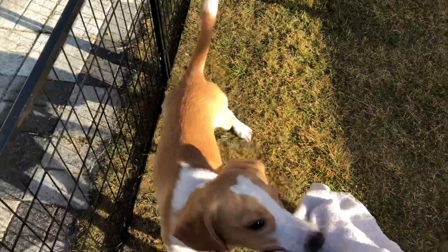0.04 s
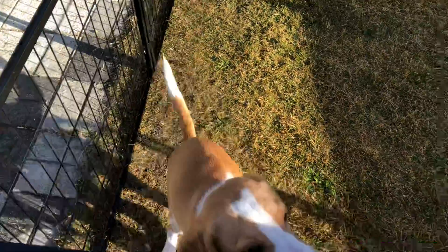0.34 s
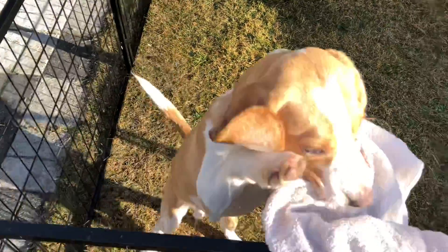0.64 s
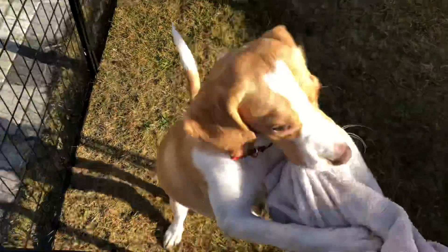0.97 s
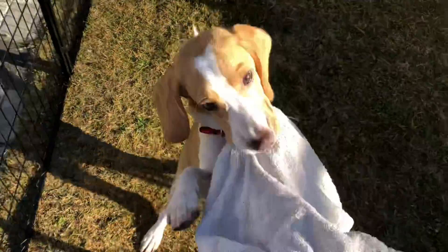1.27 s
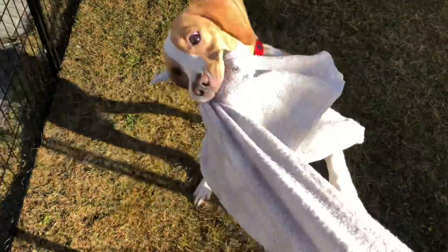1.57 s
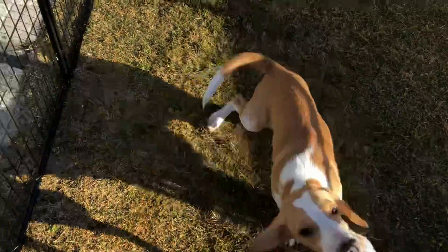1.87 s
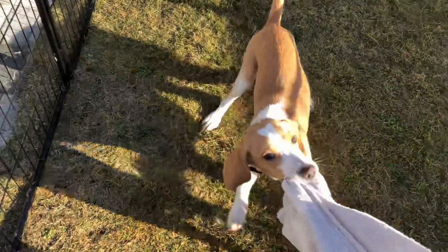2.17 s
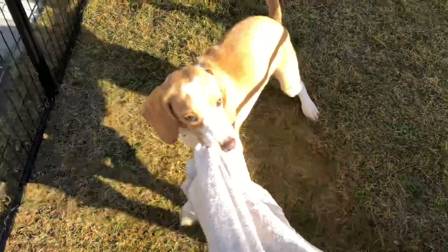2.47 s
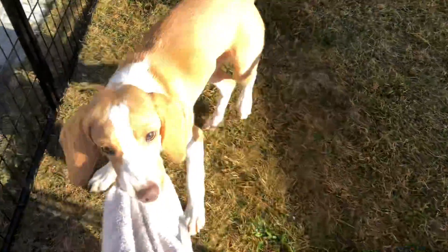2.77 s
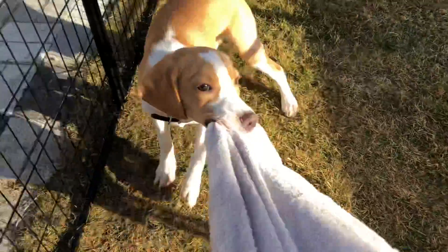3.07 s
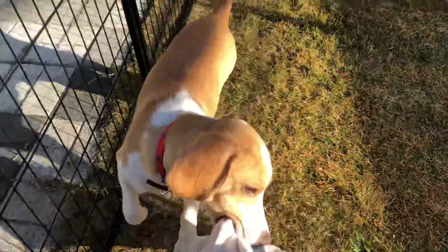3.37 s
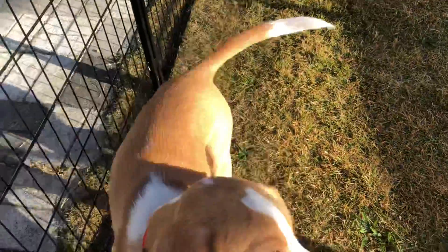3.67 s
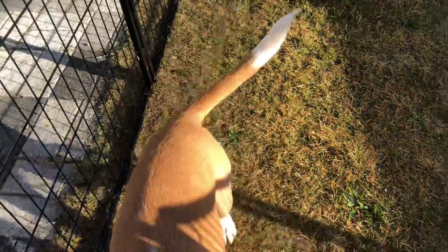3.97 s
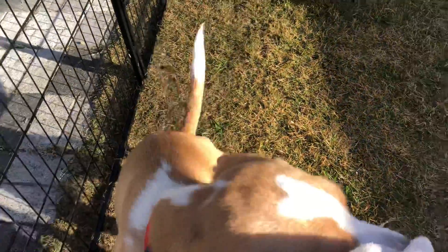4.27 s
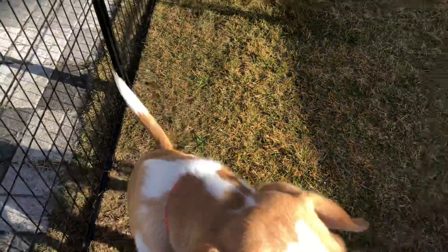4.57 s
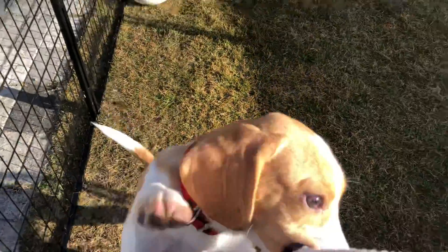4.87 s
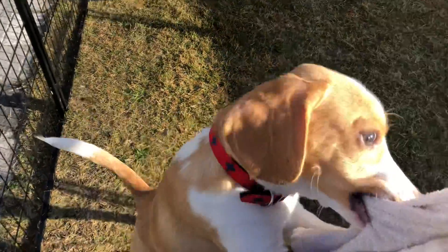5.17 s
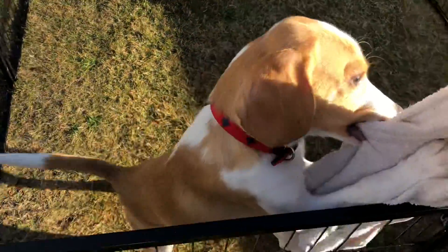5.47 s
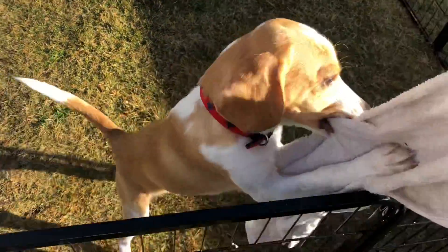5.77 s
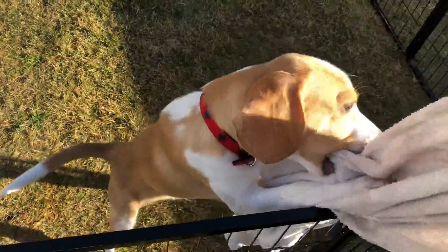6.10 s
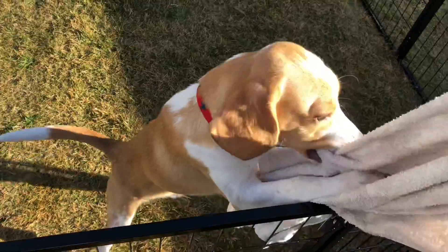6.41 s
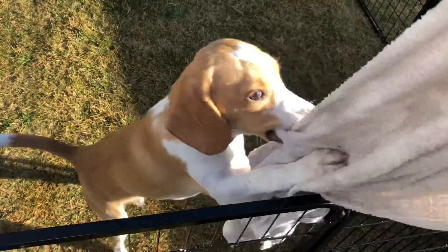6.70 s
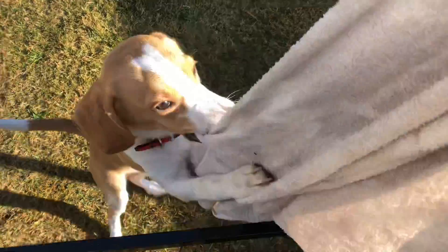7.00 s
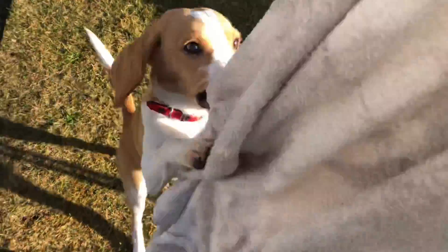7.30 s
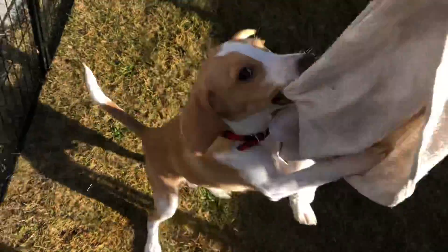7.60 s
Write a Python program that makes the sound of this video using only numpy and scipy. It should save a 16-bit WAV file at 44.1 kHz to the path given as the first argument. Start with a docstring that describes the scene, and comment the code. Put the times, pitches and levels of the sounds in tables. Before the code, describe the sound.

A puppy tugs a towel beside a wire pen outdoors, heard close. Soft, uneven cloth rubbing runs throughout, with tiny tooth ticks and occasional dull paw thuds on grass, over a low rumble and a faint distant engine. At about 0.5 seconds the pen's wires give a loud, bright double clink that rings briefly. At 1.9 seconds the pen takes a loud knock with a short rattle. Sharp snaps and a faint knock come around 2.5 seconds, followed by a stronger rustle. Lighter clinks sound at 3.8 and 4.3 seconds, and a sharp snap lands near 5 seconds among paw thuds. Small clinks follow at 5.3 and 6 seconds, then two thin snaps around 6.5 to 6.8. From 7.3 seconds the towel scrapes over the hollow top rail with a few light clinks, and the rustling continues until about 8 seconds.

```python
"""Cloth rubs over a low outdoor rumble, then wires clink: a puppy tugs a towel beside a wire pen.
The towel's loops catch and slip, teeth tick in it and paws thud on the turf; cloth, claws and wire snap.
Each bump rings the pen's wires and mesh in a short chatter; its frame takes a loud knock and a faint one.
Near the end the towel scrapes over the hollow top rail. A far engine drones underneath."""
import sys
import numpy as np
from scipy import signal
from scipy.fft import rfft, irfft, next_fast_len
from scipy.io import wavfile

SR = 44100
rng = np.random.default_rng(int(sys.argv[2]) if len(sys.argv) > 2 else 0)


def store_pcm(level_fs):
    """Save levels as 16-bit WAV."""
    pcm = np.round(np.clip(level_fs, -1, 1) * 32767).astype(np.int16)
    wavfile.write(sys.argv[1], SR, np.atleast_2d(pcm).T)


N = 346185


def from_db(db):
    return 10 ** (np.asarray(db) / 20)


def unit_rms(x):
    return x / np.sqrt(np.mean(x ** 2) + 1e-20)


def in_time(rows):
    """Columns of a time curve at every sample."""
    times_s, *columns = np.transpose(rows)
    return [np.interp(np.arange(N) / SR, times_s, column) for column in columns]


def at_hz(points, hz):
    """Interpolate on a log-frequency axis."""
    points_hz, values = np.transpose(points)
    return np.interp(np.log(np.maximum(hz, 1)), np.log(points_hz), values)


def band(x, low_hz, high_hz, order=2):
    return signal.sosfilt(signal.butter(order, [low_hz, high_hz], "band", fs=SR, output="sos"), x)


def band_noise(samples, low_hz, high_hz, order=2):
    return unit_rms(band(rng.standard_normal(samples), low_hz, high_hz, order))


def colour(x, spectrum):
    """Shape a noise by a spectrum; rms 1."""
    size = next_fast_len(N)
    gain = from_db(at_hz(spectrum, np.fft.rfftfreq(size, 1 / SR)))
    return unit_rms(irfft(rfft(x, size) * gain, size)[:N])


def drift(per_s):
    """Slow random wander; rms 1."""
    knots = rng.standard_normal(2000)
    return unit_rms(np.interp(np.arange(N) / SR * per_s, np.arange(len(knots)), knots))


def add(out, start_s, sound):
    start = round(start_s * SR)
    out[start:start + len(sound)] += sound[:N - start]


def fade(t, t60_s):
    return np.exp(-np.log(1000) * t / t60_s)


# Each row: frequency in Hz, relative density in dB.
AIR_SPECTRUM = [(20, -4.5), (35, -0.5), (55, 2), (80, -1), (130, 0), (200, -4.5), (300, -8), (500, -11),
                (1000, -15), (2000, -23), (4000, -31), (9000, -33.5), (16000, -33)]
# Each row: time in seconds, relative level in dB.
RUMBLE_LEVELS = [(0, -58), (0.8, -75), (1.8, -60), (2.7, -60.5), (4.3, -60), (5.15, -53.5), (5.45, -60),
                 (7.05, -63), (7.45, -55), (7.85, -66)]
# Each row: time in seconds, rms level in dB.
ENGINE_LEVELS = [(0, -76.5), (4.8, -64.5), (5.3, -58.5), (5.9, -60.5), (6.3, -76), (7.85, -63.5)]


def outdoors(air_db=-59, rumble_gain_db=-2, engine_hz=72.6, whine_db=-78, whine_hz=15050):
    """Steady air, a swelling far rumble, a distant engine and a faint high whine."""
    air = from_db(air_db) * colour(rng.standard_normal(N), AIR_SPECTRUM)
    rumble_db = in_time(RUMBLE_LEVELS)[0] + rumble_gain_db + 2.8 * drift(9)
    rumble = from_db(rumble_db) * band_noise(N, 33, 230)
    cycles = np.cumsum(engine_hz * (1 + 0.02 * drift(5))) / SR
    engine = from_db(in_time(ENGINE_LEVELS)[0]) * np.sqrt(2) * np.sin(2 * np.pi * cycles)
    whine = from_db(whine_db) * band_noise(N, whine_hz - 120, whine_hz + 120, order=1)
    return air + rumble + engine + whine


# Each row: start in seconds, peak in dB, pitch in Hz.
PAW_STEPS = [(0.668, -47.5, 294), (1.514, -43, 91), (1.445, -48.5, 131), (2.006, -48.5, 125),
             (2.371, -47, 350), (2.56, -39.5, 161), (3.635, -47, 170), (4.626, -47.5, 328),
             (4.956, -46, 162), (5.052, -41.5, 228), (5.285, -46.5, 279), (6.632, -50, 170),
             (7.47, -45.5, 128)]


def paws(rise_s=0.0064):
    """Soft pushes on the turf, each a low thud of noise."""
    out, t = np.zeros(N), np.arange(SR // 5) / SR
    for start_s, peak_db, hz in PAW_STEPS:
        push = rng.standard_normal(len(t)) * t * np.exp(-t / rise_s)
        thud = band(push, hz / 1.85, hz * 1.57)
        add(out, start_s, from_db(peak_db) * thud / np.abs(thud).max())
    return out


# Each row: time in seconds, level in dB, brightness in dB.
TOWEL_SLIDING = [(0, -75.5, 7.5), (0.4, -76, 2.5), (0.9, -64, -3), (1.3, -72, 3), (2.0, -69.5, 4.5),
                 (2.65, -66, -0.5), (3.08, -77.5, 7.5), (3.4, -71.5, 6), (3.7, -63.5, 2), (4.2, -67, -1.5),
                 (4.62, -64.5, 3), (5.15, -68.5, -1.5), (5.45, -70, 4), (5.75, -77.5, -2),
                 (6.25, -81, -5.5), (6.42, -70.5, -3), (7.15, -70.5, -2.5), (7.85, -68, -6)]
# Each row: peak time in seconds, width at half height in seconds, level in dB, brightness in dB.
TOWEL_STROKES = [(0.115, 0.43, -70, -15.5), (1.47, 0.074, -66, -1), (1.646, 0.07, -58.5, 0),
                 (1.812, 0.22, -63, -7), (2.234, 0.043, -67.5, -3), (2.393, 0.047, -71, -14),
                 (2.58, 0.13, -60, -3.5), (2.811, 0.062, -56.5, -1.5), (4.063, 0.26, -64, -1),
                 (4.484, 0.092, -59.5, -5), (4.71, 0.13, -67.5, -6), (5, .14, -64, -4.5),
                 (6.59, 0.076, -73.5, -13), (6.927, 0.1, -72.5, 7), (7.026, 0.049, -57, 0.5),
                 (7.309, 0.063, -58.5, -5.5), (7.528, 0.19, -62.5, -12), (7.717, 0.11, -63.5, -3),
                 (7.835, 0.15, -57.5, -1)]


def cloth_motion(lean, rise_share=0.68):
    """Gain of steady sliding plus quick tugs; lean is negative for a dull layer, positive for a bright."""
    t = np.arange(N) / SR
    slide_db, slide_bright_db = in_time(TOWEL_SLIDING)
    power = from_db(slide_db + lean * slide_bright_db) ** 2
    for peak_s, width_s, level_db, bright_db in TOWEL_STROKES:
        start_s = peak_s - 2 * rise_share * width_s
        swell = np.interp(t, [start_s, peak_s, start_s + 2 * width_s], [0, 1, 0])
        power += (from_db(level_db + lean * bright_db) * swell) ** 2
    return np.sqrt(power)


def friction(spectrum, grains_per_s, flutter_db, smooth_gain=0.98):
    """Loops of cloth catch and slip: uneven grains over a smooth hiss."""
    grains = (rng.random(N) < grains_per_s / SR) * rng.standard_normal(N)
    texture = unit_rms(grains) + smooth_gain * rng.standard_normal(N)
    return colour(texture * from_db(flutter_db * drift(45)), spectrum)


# The towel's three layers. Each row: frequency in Hz, relative density in dB.
RUB_SPECTRUM = [(150, -16.5), (350, -11), (550, -6.5), (800, 0), (1150, 1.5), (1500, -5), (2200, -18.5),
                (4000, -25.5)]
BRUSH_SPECTRUM = [(900, -19), (1800, 3), (2500, 1), (3900, 0.5), (5500, -7), (9000, -22)]
HISS_SPECTRUM = [(3500, -4.5), (6500, 0.5), (10000, -1), (13000, -2.5), (16000, -16)]


def towel(brush_gain_db=-1):
    """Cloth drags over itself, fur and the rail: pressed hard it rubs dully, sliding lightly it hisses."""
    rub = cloth_motion(-0.81) * friction(RUB_SPECTRUM, grains_per_s=800, flutter_db=4, smooth_gain=0.75)
    brush = cloth_motion(0) * friction(BRUSH_SPECTRUM, grains_per_s=2000, flutter_db=3.5)
    hiss = cloth_motion(1) * friction(HISS_SPECTRUM, grains_per_s=6500, flutter_db=2)
    return rub + from_db(brush_gain_db) * brush + hiss


# Each row: time in seconds, rms level in dB.
SCRAPE_LEVELS = [(7.265, -89.5), (7.295, -54), (7.36, -49), (7.46, -56.5), (7.53, -57.5), (7.62, -58),
                 (7.72, -66.5), (7.85, -76)]
# Each row: centre in Hz, bandwidth in Hz, relative level in dB.
RAIL_RESONANCES = [(746, 78, -8), (940, 90, -11), (1089, 57, 1), (1290, 110, -8.5), (1468, 79, -10.5)]


def rail_scrape(slips_per_s=1500, flutter_db=2):
    """Dense slips of the towel keep the hollow top rail ringing."""
    slips = (rng.random(N) < slips_per_s / SR) * rng.standard_normal(N)
    slips = slips * from_db(flutter_db * drift(35)) + 1e-18
    rail = sum(from_db(db) * unit_rms(band(slips, hz - width_hz / 2, hz + width_hz / 2, order=1))
               for hz, width_hz, db in RAIL_RESONANCES)
    return from_db(in_time(SCRAPE_LEVELS)[0]) * unit_rms(rail)


# Each row: start in seconds, relative level in dB.
TOOTH_TICKS = [(0.352, -50), (0.69, -49), (0.707, -46.5), (0.873, -45), (1.019, -46), (1.126, -45),
               (1.211, -47.5), (1.312, -46), (1.428, -47.5), (1.686, -46.5), (2.023, -48.5), (2.518, -46),
               (2.838, -45.5), (2.92, -50), (3.732, -42), (4.017, -45.5), (4.94, -41), (5.061, -46.5),
               (5.982, -48.5), (6.746, -49), (7.257, -46)]


def tooth_ticks(gain_db=1, start_hz=1880, end_hz=510, click_db=-2, scatter_db=-23,
                faint_per_s=2, faint_db=-55.5):
    """Teeth work the cloth: a tiny click, a fast fall in pitch, a scatter. Faint ticks come at random."""
    out, t = np.zeros(N), np.arange(SR // 10) / SR
    faint = [(i / SR, faint_db) for i in np.flatnonzero(rng.random(N) < faint_per_s / SR)]
    click = band(signal.unit_impulse(len(t)), 2060, 4000)
    click *= from_db(click_db) / np.abs(click).max()
    for start_s, level_db in list(TOOTH_TICKS) + faint:
        glide_s, rise_s = np.array([0.0016, 0.001]) * np.exp(0.15 * rng.standard_normal(2))
        hz = end_hz + (start_hz - end_hz) * np.exp(-t / glide_s)
        envelope = t / rise_s * np.exp(1 - t / rise_s)
        tone = np.sin(2 * np.pi * np.cumsum(hz) / SR) * envelope
        scatter = from_db(scatter_db) * band_noise(len(t), 700, 4000, order=1) * fade(t, t60_s=0.065)
        add(out, start_s, from_db(level_db + gain_db) * (tone + click + scatter))
    return out


# Each row: start in seconds, peak in dB, centre in Hz.
SHARP_SNAPS = [(2.4694, -37, 2580), (2.5454, -32, 1390), (2.548, -25.5, 810), (2.5498, -24, 1670),
               (4.961, -23, 4380), (5.051, -34.5, 7000), (6.4967, -37.5, 10000), (6.76, -39, 9800)]


def snaps(edge_ratio=1.68, tail_db=-33, tail_t60_s=0.054):
    """Sharp, heavily damped snaps of taut cloth, claws and struck pen wire, with a faint scatter."""
    out, t = np.zeros(N), np.arange(SR // 10) / SR
    for start_s, peak_db, hz in SHARP_SNAPS:
        push = from_db(tail_db) * np.sqrt(hz / 10000) * rng.standard_normal(len(t)) * fade(t, tail_t60_s)
        push[0] = 1
        snap = band(push, hz / edge_ratio, hz * edge_ratio, order=3)
        add(out, start_s, from_db(peak_db) * snap / np.abs(snap).max())
    return out


# Each row: start in seconds, crack in dB, panel rattle in dB, frame ring in dB.
FRAME_KNOCKS = [(1.8879, -24.5, -40.5, -26.5), (2.55, -47, -49, -56)]
# Each row: frequency in Hz, relative level in dB, t60 in seconds.
FRAME_MODES = [(107, 9, 0.0093), (170, -5, 0.14), (340, -8, 0.063), (561, -7, 0.07), (592, -9, 0.12),
               (1130, -28, 0.092), (1540, -4.5, 0.05), (1593, -14, 0.21), (1860, -9, 0.047),
               (2350, -4, 0.02)]


def frame_knocks(crack_rise_s=0.00096, frame_lag_s=0.00227):
    """A bright crack, then the heavy frame swings and its panel rattles."""
    out, t = np.zeros(N), np.arange(SR // 2) / SR
    hz, mode_db, t60_s = np.transpose(FRAME_MODES)
    modes = np.sin(2 * np.pi * np.outer(hz, t)) * fade(t, t60_s[:, None])
    for start_s, crack_db, rattle_db, frame_db in FRAME_KNOCKS:
        attack = 1 - np.exp(-t / crack_rise_s)
        crack = band_noise(len(t), 1000, 13000, order=1) * attack * fade(t, t60_s=0.023)
        rattle = band_noise(len(t), 520, 1800) * fade(t, t60_s=0.22)
        frame = (from_db(mode_db) * rng.choice([-1, 1], len(hz))) @ modes
        add(out, start_s, from_db(crack_db) * crack + from_db(rattle_db) * rattle)
        add(out, start_s + frame_lag_s, from_db(frame_db) * frame)
    return out


def ringing(hz, t60_s, t):
    """One decaying sine per mode, at random phase."""
    phase = rng.random((len(hz), 1))
    return np.sin(2 * np.pi * (np.outer(hz, t) + phase)) * fade(t, t60_s[:, None])


def wires(centre_hz, t, spread, t60_cycles, count=20):
    """Nearly equal wires clash: a cluster of modes, strongest in the middle."""
    place = 2 * (np.arange(count) + rng.random(count)) / count - 1
    hz = centre_hz * (1 + spread * place)
    return np.cos(np.pi / 2 * place) @ ringing(hz, t60_cycles / hz, t) * np.sqrt(2 / count)


def metal_crack(t, t60_s=0.016, click_db=9):
    """Metal meets metal: a click and a brief bright burst."""
    contact = rng.standard_normal(len(t)) * fade(t, t60_s)
    contact[0] += from_db(click_db)
    return band(contact, 4467, 16000, order=1)


def chatter(t, decay_s, bounces_per_s=1200, bounce_gain=0.26):
    """A first contact and a dying run of bounces; unit energy."""
    bounces = (rng.random(len(t)) < bounces_per_s / SR) * rng.choice([-1, 1], len(t))
    touches = bounces * bounce_gain * np.exp(-t / decay_s)
    touches[0] = 1
    return touches / np.sqrt(np.sum(touches ** 2))


# Each row: frequency in Hz, t60 in seconds.
MESH_RING_TIMES = [(400, 0.43), (1500, 0.28), (3000, 0.33), (5000, 0.26), (8000, 0.2), (11000, 0.16),
                   (16000, 0.031)]
# Each row: frequency in Hz, relative level in dB, t60 in seconds.
STRONG_PEN_MODES = [(1738, 3, 0.28), (2254, -6, 0.99), (2446, -6.5, 1.0), (2570, -11, 1),
                    (2824, -0.5, 0.18), (3380, -0.5, 0.45), (3696, -3, 0.86), (4290, -9, 0.63),
                    (4350, -7.5, 0.82), (4540, -6, 0.75), (4770, -10.5, 0.79), (5540, -4, 0.29),
                    (5760, -5.5, 0.7), (6520, -5.5, 0.47), (7130, -11.5, 0.55), (8150, -9.5, 0.49),
                    (7900, -1.5, 0.22), (9200, 4.5, 0.2), (9910, 8, .17), (10980, 4.5, 0.119),
                    (11630, -0.5, 0.14), (15500, -12.5, .09)]
# Harder blows clash more unlike wires. Each row: blow level in dB, pitch spread as a fraction.
LONG_WIRE_SPREAD = [(-39.5, 0.01), (-37, .14)]
# Each row: start in seconds, level in dB, low, middle and top register gains in dB, crack gain in dB,
# chatter decay in seconds, long wires' pitch in Hz and gain in dB, short wires' pitch in Hz and gain in dB.
PEN_BLOWS = [(0.495, -26.5, -17.5, -6.5, 6, -11, 0.017, 4600, -18, 12300, -10),
             (0.542, -16.5, -17, -8.5, 1, 2.5, .0007, 5940, -4, 9720, 7.5),
             (3.838, -37.5, 2.5, 4.5, 15, 9, 0.016, 4240, 10.5, 11400, 12),
             (4.2632, -32.5, -6.5, -2, 0.5, 6, 0.0068, 3750, -3, 9540, 3.5),
             (4.32, -44, -3.5, -10, 9, 2, 0.0082, 5850, -3, 11100, 9.5),
             (4.7526, -53, -8, 2.5, 0, 2, 0.0067, 4580, 0, 11000, -3),
             (4.961, -47, 0.5, -7, 2, 2, 0.0015, 3520, -3, 9440, 1),
             (5.2672, -46.5, -9, -13, 12, 4, .002, 9900, 2.5, 10900, 12),
             (5.9816, -38.5, -15, -11, 8, 3, 0.0024, 9540, -2, 14800, 13),
             (7.2758, -47, 1, -10, -6, 7.5, .013, 6440, -4, 10000, -5),
             (7.318, -56, 11, 1, 6, -6, 0.0048, 3000, -6, 10300, 12),
             (7.3738, -38, -12, -8, -2, -9, 0.023, 4820, -3, 12100, 5)]


def pen_clinks(strong_db=-23.5, wires_db=-4, vary_db=2, panel_hz=800, mesh_count=700):
    """Each blow rings the struck wires, the pen's strong modes and the welded mesh's dense weak modes."""
    out, t = np.zeros(N), np.arange(round(0.7 * SR)) / SR
    mesh_hz = 400 + 15600 * ((np.arange(mesh_count) + rng.random(mesh_count)) / mesh_count) ** 1.4
    mesh_t60_s = at_hz(MESH_RING_TIMES, mesh_hz) * np.exp(0.071 * rng.standard_normal(mesh_count))
    mesh_modes = ringing(mesh_hz, mesh_t60_s, t)
    # Near-equal panels split each strong mode into seven that beat.
    hz, mode_db, t60_s = np.repeat(STRONG_PEN_MODES, 7, axis=0).T
    strong_modes = ringing(hz * (1 + 0.015 * rng.standard_normal(len(hz))), t60_s, t)
    for (start_s, level_db, low_db, middle_db, top_db, crack_db, chatter_s,
         long_hz, long_db, short_hz, short_db) in PEN_BLOWS:
        # Where and how hard the pen is hit decides which register speaks.
        register = [(400, low_db - 11), (1500, low_db), (3600, middle_db),
                    (6500, middle_db / 2 + 3), (9500, 0), (13000, top_db)]
        mesh_gains = from_db(at_hz(register, mesh_hz)) * rng.standard_normal(mesh_count)
        mesh = mesh_gains @ mesh_modes / np.sqrt(mesh_count)
        light_blow_lift_db = 0.04 * max(-24 - level_db, 0)
        ring_db = strong_db + light_blow_lift_db + mode_db + at_hz(register, hz)
        ring_db += vary_db * rng.standard_normal(len(hz))
        long_spread = np.interp(level_db, *np.transpose(LONG_WIRE_SPREAD))
        long_wires = from_db(long_db) * wires(long_hz, t, long_spread, t60_cycles=1700)
        short_wires = from_db(short_db) * wires(short_hz, t, spread=0.071, t60_cycles=1200)
        # The whole panel hums under blows rich in lows.
        panel = from_db(2 * low_db - 10.5) * wires(panel_hz, t, spread=0.24, t60_cycles=540)
        ring = (from_db(ring_db) * rng.choice([-1, 1], len(hz))) @ strong_modes
        body = mesh + ring + from_db(wires_db) * (long_wires + short_wires + panel)
        strike = body + from_db(crack_db) * metal_crack(t)
        clink = signal.fftconvolve(strike, chatter(t, chatter_s))[:len(t)]
        add(out, start_s, from_db(level_db) * clink)
    return out


def scene():
    """All sources at one close microphone."""
    impacts = pen_clinks() + snaps() + frame_knocks() + paws()
    return (impacts + towel() + rail_scrape() + outdoors() + tooth_ticks())[None]


def record(dry, low_cut_hz=41, high_cut_hz=16000):
    """The microphone sheds the deep bass; the top is cut steeply."""
    high_pass = signal.butter(4, low_cut_hz, "high", fs=SR, output="sos")
    low_pass = signal.ellip(10, 0.3, 80, high_cut_hz, fs=SR, output="sos")
    return signal.sosfilt(low_pass, signal.sosfilt(high_pass, dry))


dry = scene()
out = record(dry)
store_pcm(out)
```